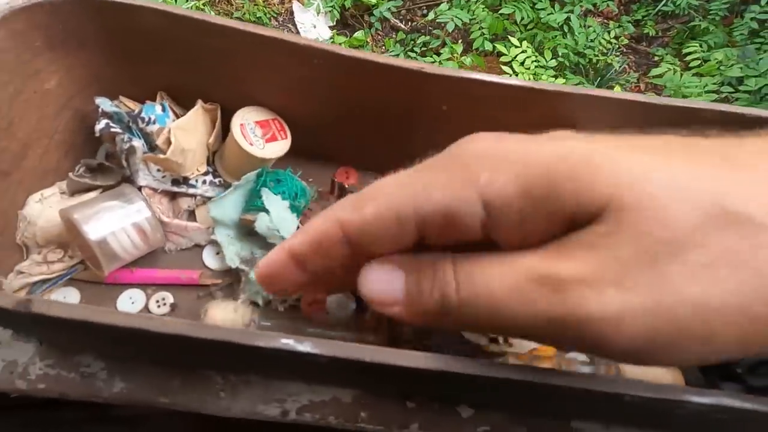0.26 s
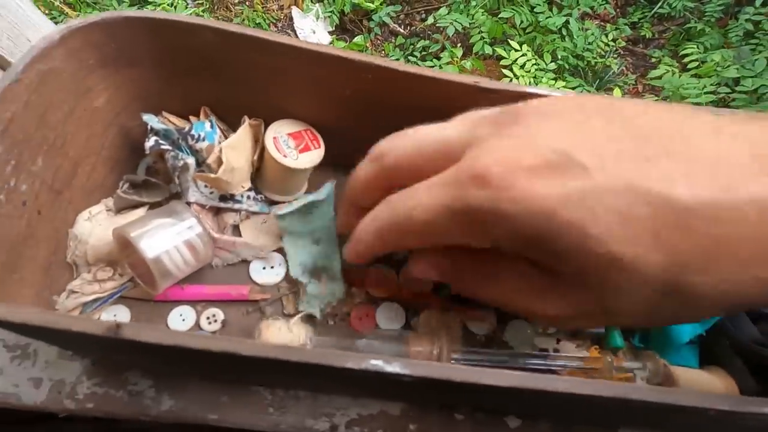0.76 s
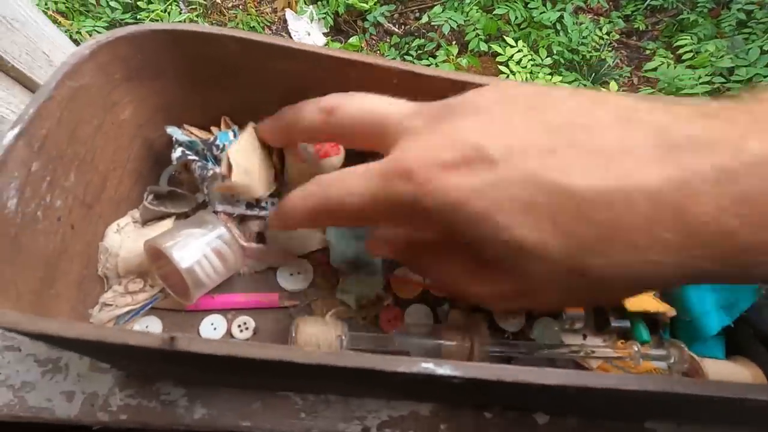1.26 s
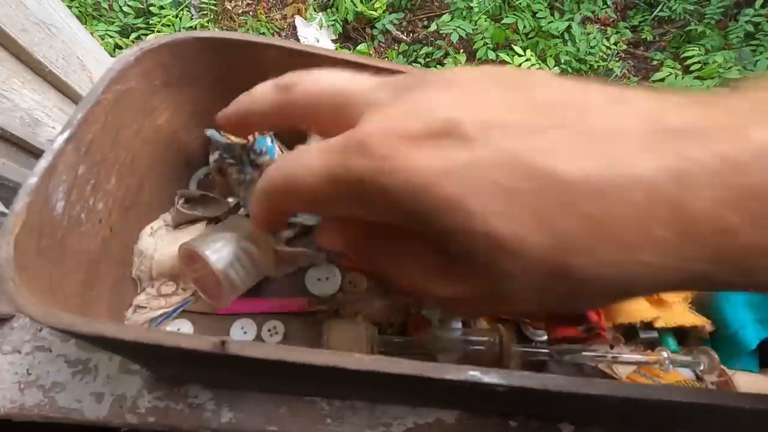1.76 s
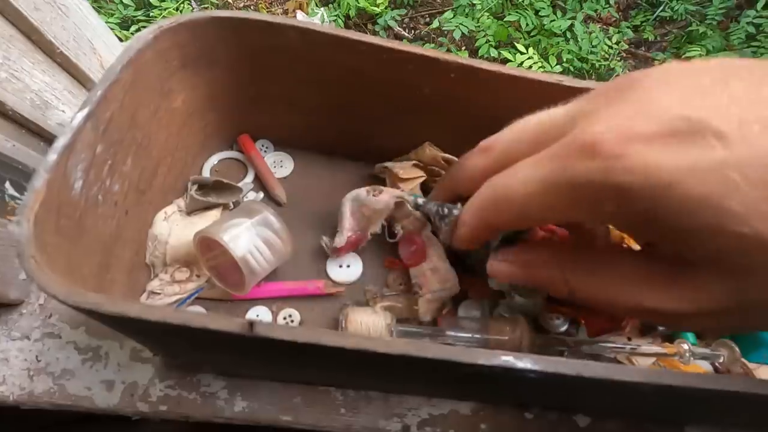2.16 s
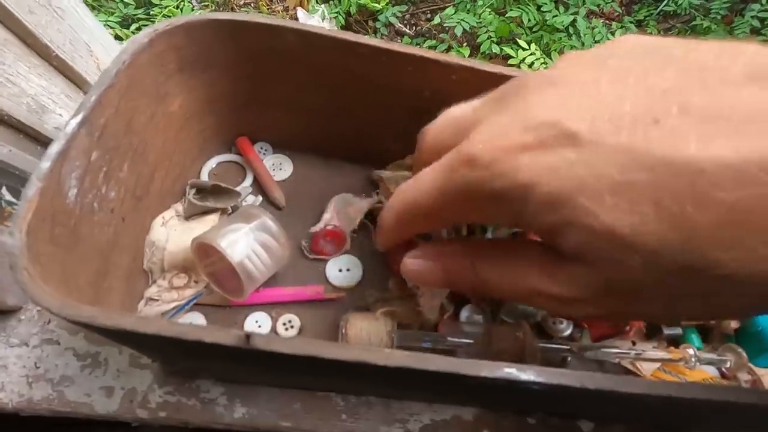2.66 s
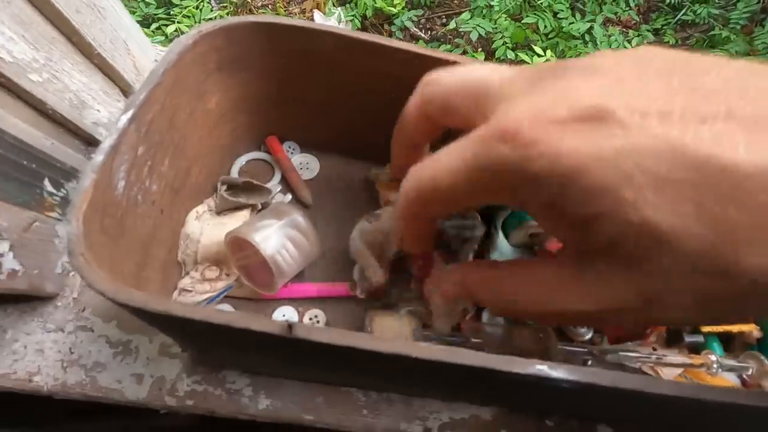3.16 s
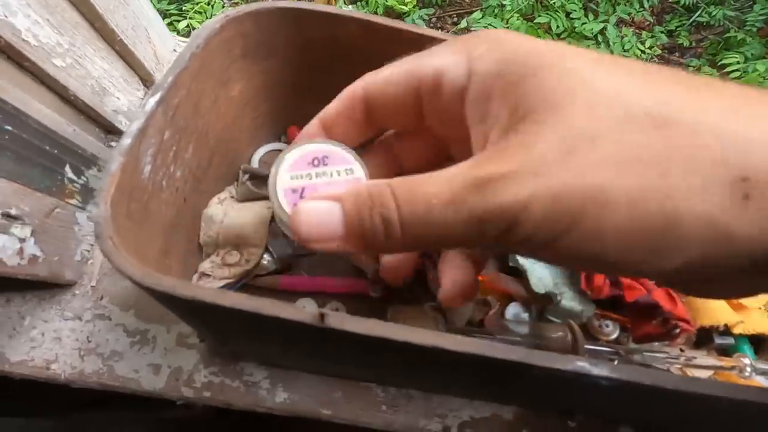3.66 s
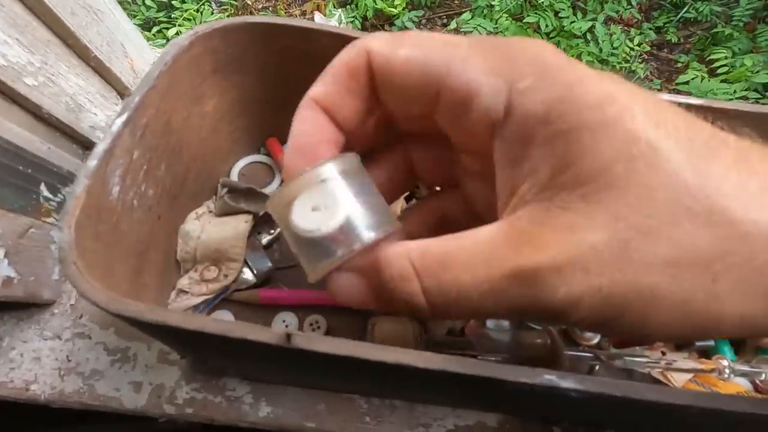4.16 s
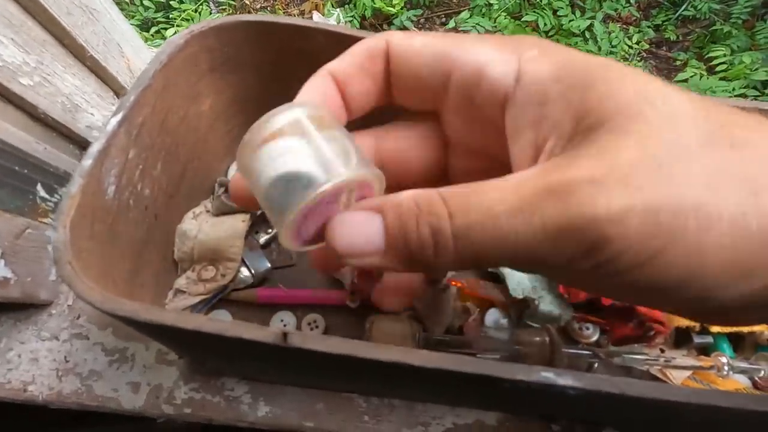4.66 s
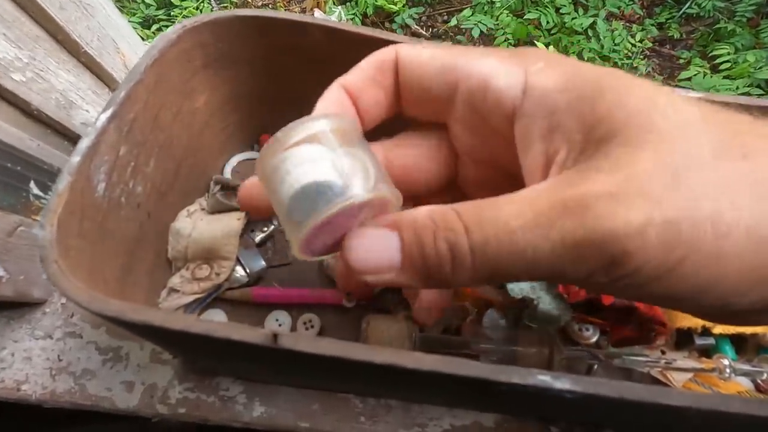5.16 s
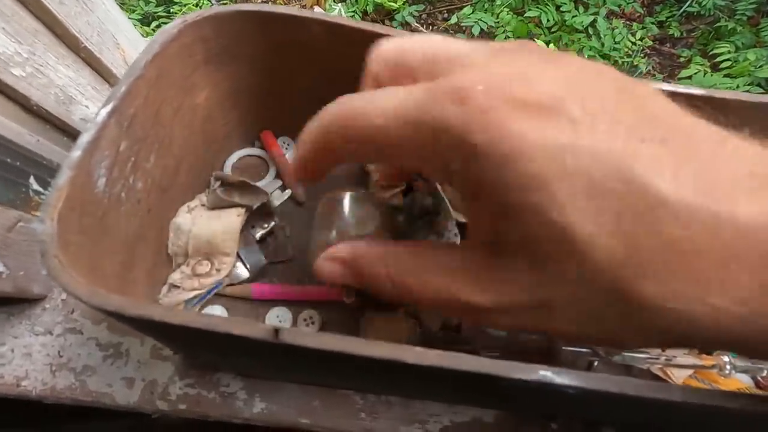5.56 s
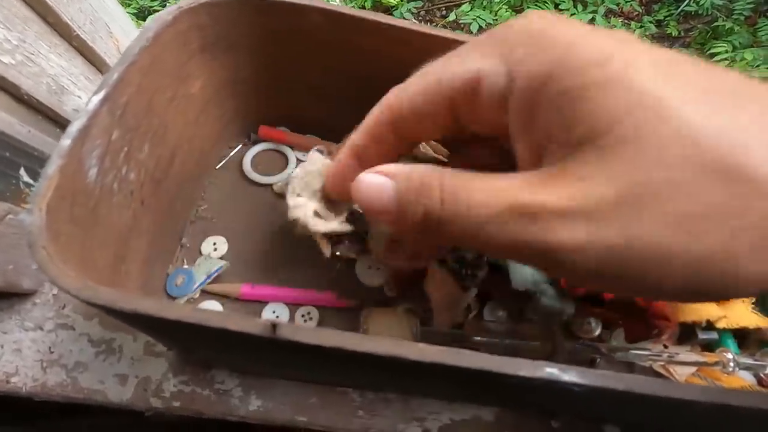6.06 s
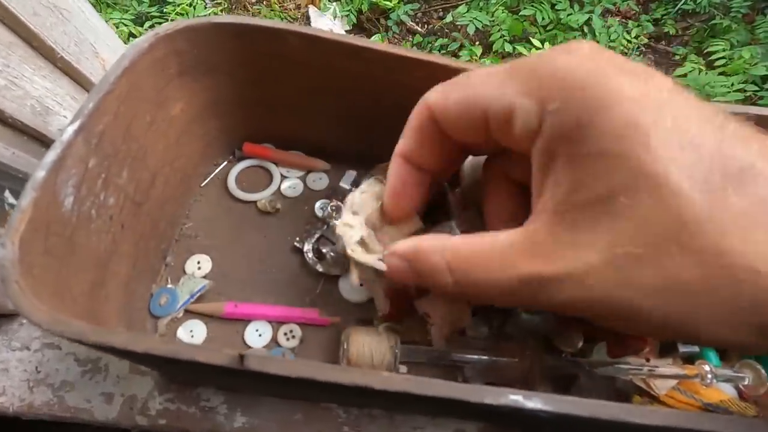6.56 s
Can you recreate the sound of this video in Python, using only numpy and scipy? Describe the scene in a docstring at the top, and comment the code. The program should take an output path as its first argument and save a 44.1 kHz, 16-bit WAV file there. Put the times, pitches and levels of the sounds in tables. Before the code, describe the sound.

Outdoors, dry and close: dull knocks on drawer boards, hard button clicks and short rubbing of cloth and paper, irregular and crowded for two seconds. A softer rustling lull follows, then another knock and clatter, then near quiet with isolated sharp tinkling ticks. Late on, a rapid metallic rattle bursts out with more knocks. Throbbing high cricket trills and a faint low drone continue behind.

```python
"""Outdoors beside weeds: a hand rummages in a wooden drawer, close to a small camera microphone.
Spools and knuckles knock the boards, and buttons and metal parts click: decaying sines, led by each blow's pitch.
Cloth and paper drag along the bottom: random slips ringing the resonances of boards, buttons and crackle.
Crickets trill in the weeds as throbbing narrow noise, and a lone one, a pulsed sine, joins later.
Behind them lie the open air, as shaped noise, and a far motor's drone, as three wavering harmonics."""
import sys
import numpy as np
from scipy import signal
from scipy.fft import rfft, irfft
from scipy.io import wavfile
from scipy.ndimage import uniform_filter1d

SR = 44100
rng = np.random.default_rng(int(sys.argv[2]) if len(sys.argv) > 2 else 0)


def master(y):
    """Save y as 16-bit WAV."""
    cut = np.clip(np.atleast_2d(y).T, -1, 1)
    pcm = np.round(cut * 32767)  # scale
    wavfile.write(sys.argv[1], SR, pcm.astype(np.int16))


N = 300762  # length in samples

# open air, relative noise density: pitch_hz, level_db (per Hz)
AIR_SPECTRUM = [(25, -14), (60, -10), (120, -5), (200, -1.5), (320, -8), (600, -15), (1200, -15.5),
                (3000, -14.5), (5000, -23), (7300, -11.5), (8200, -26.5), (9100, -24.5), (10300, -25.5),
                (11200, -42), (12300, -40), (13000, -43), (16000, -64)]
AIR_RMS_DB = -47.5

# harmonics of the far motor: multiple (of the fundamental), level_db
MOTOR_HARMONICS = [(1, -68), (2, -55.5), (3, -56.5)]
MOTOR_HZ = 87.1

# two groups of trilling crickets, lower one first: pitch_hz, spread_hz, throbs_per_s
TRILLERS = [(6030, 110, 31), (6310, 130, 34.3)]
# trills of the higher group: middle_s, level_db
HIGH_TRILLS = [(.07, -41), (.52, -44.5), (.68, -55), (1.12, -56), (1.32, -51), (1.6, -43), (1.97, -50),
               (2.2, -50), (2.41, -50), (2.7, -52), (2.88, -57), (3.18, -43), (3.54, -46), (4.0, -53),
               (4.45, -43.5), (4.75, -52), (4.92, -49), (5.27, -45.5), (5.74, -48), (6.04, -46), (6.4, -53),
               (6.75, -47)]
HIGH_TRILL_S = 0.088  # from the middle to 1/e of the gain
LOW_TRILL_DB, LOW_FIRST_S, LOW_PER_S, LOW_TRILL_S = -49.5, 0.1, 2.9, 0.076
BETWEEN_TRILLS_DB = (-59.5, -54.5)  # lower group, higher group
FAR_CRICKETS_RMS_DB = -52
LONE_HZ, LONE_RMS_DB, LONE_PULSES_PER_S = 6965, -59, 14.815
LONE_PHASE_S, LONE_JOINS_S = .001, 3.8

# pushes of the hand through the heap: start_s, length_s, boards_db, parts_db (buttons and paper), crackle_db
PUSHES = [(0.048, 0.1, -39, -53, -70), (0.22, 0.14, -42.5, -46.5, -66), (0.364, 0.045, -20.5, -36, -74),
          (0.41, 0.032, -28.5, -37.5, -80), (0.758, 0.17, -32, -39, -66), (0.873, 0.076, -28.5, -33, -55),
          (0.964, 0.076, -33.5, -48, -61), (1.034, 0.029, -35.5, -41, -64), (1.09, .08, -42, -49, -68),
          (1.159, 0.063, -24.5, -41.5, -64), (1.213, 0.079, -43, -38, -74),
          (1.409, 0.087, -39.5, -45, -50.5), (1.459, 0.032, -20, -34, -43.5),
          (1.509, 0.12, -23.5, -31.5, -44), (1.627, 0.085, -28.5, -34, -49),
          (1.764, 0.12, -32.5, -43.5, -57), (1.953, 0.022, -30.5, -32.5, -42.5),
          (2.01, 0.082, -37, -33.5, -46), (2.099, 0.12, -27.5, -32, -39.5), (2.208, 0.12, -37.5, -48, -64),
          (2.301, 0.079, -35, -40, -65), (2.422, 0.21, -47, -50.5, -59), (2.739, 0.14, -48.5, -47.5, -54),
          (2.948, 0.069, -43, -51.5, -57), (3.09, 0.3, -43, -43.5, -48.5), (3.334, 0.12, -34, -47.5, -66),
          (3.432, 0.17, -39.5, -49.5, -67), (3.602, 0.079, -32, -36.5, -49.5),
          (3.713, 0.059, -39.5, -47, -51), (3.844, 0.033, -35.5, -52, -67), (4.585, 0.2, -56, -49, -60),
          (5.438, 0.25, -56, -53.5, -58), (5.584, 0.034, -35, -44, -55), (5.652, 0.031, -50, -59, -67),
          (5.884, .065, -28, -31, -43), (6.011, 0.076, -22.5, -32.5, -54), (6.081, 0.082, -29.5, -38, -52),
          (6.162, 0.046, -34, -39, -47.5), (6.275, 0.048, -40, -50, -63), (6.35, 0.057, -51, -44, -60),
          (6.604, 0.024, -33, -43.5, -68), (6.683, 0.11, -44, -52.5, -59)]
PUSH_ATTACK_S, SETTLE_DB_PER_S = 0.0067, 186
SWELL_SHARE = .25  # share of a push's length added to its attack: longer pushes swell more slowly
RESTING_DB = (-57, -73, -75)  # boards, parts, crackle while the hand barely moves

# resonances of drawer boards and air: pitch_hz, width_hz, level_db
DRAWER_MODES = [(101, 52, -11), (121, 23, -8), (174, 54, -0.5), (230, 61, -1), (294, 88, -3), (394, 57, -6),
                (467, 115, -2.5), (557.8, 61, -5.5), (653, 67, -3.5), (859, 124, -3.5), (961, 150, -3),
                (1230, 250, -0.5), (1466, 470, -7)]
# resonances of buttons and plastic cup: pitch_hz, width_hz, level_db
PARTS_MODES = [(1523, 310, -6), (1781, 180, -7.5), (2063, 400, -4), (2448, 284, -6), (2827, 680, -1),
               (3365, 1200, -1.5), (3900, 650, -3), (4420, 260, -7), (5030, 1740, -3)]
# resonances at the top of the crackle: pitch_hz, width_hz, level_db
CRACKLE_MODES = [(7200, 580, 4.5), (7960, 1150, -9), (10130, 220, -1), (11900, 500, -13),
                 (14200, 4500, -53)]
BOARDS_LEAN_DB, PARTS_LEAN_DB = 6, 4.5  # dB per octave away from the pitch of the blows nearby

# blows on the boards: start_s, level_db (peak), pitch_hz (strongest ring)
KNOCKS = [(.077, -17, 303), (.097, -22, 244), (0.117, -27.5, 232), (.324, -26, 666), (.38, -8.5, 540),
          (.441, -18, 175), (0.473, -24, 490), (0.775, -14, 406), (0.828, -13, 387), (0.868, -13.5, 490),
          (0.891, -13, 643), (0.911, -14.5, 664), (.939, -17, 420), (0.954, -15, 445), (.97, -18, 674),
          (0.996, -24, 460), (1.043, -12, 450), (1.093, -36, 127), (1.183, -2.5, 630), (1.197, -16, 573),
          (1.238, -18, 450), (1.465, -5.5, 497), (1.496, -8, 383), (1.52, -15.5, 110), (1.533, -9, 420),
          (1.549, -20, 240), (1.585, -11, 438), (1.637, -19, 340), (1.695, -16, 390), (1.792, -15.5, 440),
          (1.845, -9.5, 500), (1.91, -19.5, 460), (1.962, -11.5, 405), (2.03, -22.5, 900),
          (2.058, -13.5, 880), (2.128, -13.5, 815), (2.201, -19, 450), (2.345, -24.5, 248),
          (2.583, -28, 570), (3.388, -5.5, 680), (3.434, -17.5, 660), (3.49, -23, 314), (3.607, -23.5, 455),
          (3.637, -18.5, 460), (3.69, -13.5, 905), (3.763, -25, 1040), (3.849, -11, 620),
          (3.866, -23.5, 586), (5.582, -10.5, 710), (5.679, -21, 630), (5.891, -19.5, 259),
          (5.926, -23, 870), (5.945, -24, 940), (5.981, -18, 418), (6.013, -9, 454), (6.046, -11, 495),
          (6.076, -16, 470), (6.121, -27, 458), (6.169, -13, 443), (6.228, -22, 484), (6.608, -19, 275),
          (6.628, -11.5, 704), (6.768, -29, 243)]

# small parts clicking, levels are peaks: start_s, metal_db, metal_hz, plastic_db, plastic_hz, top_db
CLICKS = [(.079, -47, 5960, -35, 3450, -43), (.3, -50, 6000, -31, 2950, -46),
          (0.323, -53, 6350, -25.5, 1720, -59), (0.3373, -44, 6500, -25, 2900, -47),
          (0.3769, -26, 6160, -0.5, 1460, -33), (0.9345, -18.5, 6850, -12, 3120, -28.5),
          (0.9418, -27, 5600, -17, 3130, -42), (0.968, -41, 6430, -23.5, 2010, -51),
          (1.0584, -33, 7060, -23.5, 3560, -32.5), (1.1859, -20.5, 5700, -6.5, 1770, -35),
          (1.234, -24, 7010, -17.5, 1730, -45), (1.245, -26, 7110, -11.5, 1820, -33),
          (1.273, -23, 6000, -13, 2960, -40), (1.4668, -42, 6330, -11, 1500, -55),
          (1.4957, -38, 7150, -16.5, 1500, -41), (1.5834, -16.5, 5940, -16, 2950, -25.5),
          (1.604, -34, 6940, -21, 3120, -42), (1.655, -36, 6920, -17.5, 2140, -44),
          (1.6648, -22.5, 5430, -19, 2120, -26), (1.7041, -22, 7100, -19, 2750, -31),
          (1.713, -19.5, 6900, -19, 2130, -36), (1.847, -46, 6500, -23.5, 1510, -46),
          (1.9097, -33, 5900, -23.5, 1810, -34), (1.9635, -20.5, 6730, -25, 1840, -47),
          (1.9779, -10.5, 7150, -14, 2480, -31), (2.029, -34, 5650, -4, 2760, -36),
          (2.0575, -37, 7590, -10.5, 2280, -50), (2.111, -20.5, 7320, -31, 4240, -25),
          (2.131, -33, 6780, -22, 2970, -40), (2.1619, -22, 5800, -28, 2350, -24),
          (2.5855, -25, 6050, -22.5, 2790, -34), (2.882, -40, 6000, -36, 4380, -45),
          (3.097, -36, 5600, -32, 3320, -48), (3.3361, -37, 6270, -31, 2840, -32),
          (3.3896, -32, 6100, -17.5, 1510, -54), (3.5748, -19, 6250, -24.5, 5100, -41),
          (3.607, -27, 6560, -22, 3950, -55), (3.638, -14, 6900, -22, 2100, -32),
          (3.6426, -30, 6990, -17, 4000, -44), (3.6564, -31, 7140, -17, 3720, -47),
          (3.672, -23, 6590, -31, 2120, -48), (3.6819, -33, 6720, -14, 2070, -36),
          (3.6886, -24, 6640, -14, 2040, -32), (3.7574, -27.5, 5760, -36, 2460, -27.5),
          (3.763, -36, 6120, -23, 1900, -46), (3.851, -45, 6220, -23, 1730, -59),
          (4.076, -48, 6500, -33, 2050, -60), (4.122, -23.5, 6700, -44, 1960, -48),
          (4.2373, -23, 7970, -22, 3170, -40), (4.2853, -24.5, 7260, -37, 4510, -35),
          (4.6008, -15.5, 6260, -18, 4100, -37), (4.6106, -20, 6370, -22, 4000, -48),
          (4.6831, -2, 6860, -31, 4450, -28), (4.6947, -21, 6500, -45, 2490, -51),
          (4.735, -12, 7800, -17, 3670, -24), (4.8266, -10, 6460, -35, 4590, -49),
          (5.4629, -16.5, 7800, -24.5, 4600, -36), (5.576, -24, 6830, -26.5, 4700, -41),
          (5.58, -36, 6430, -21, 1480, -53), (5.616, -31, 6640, -23, 2070, -54),
          (5.6393, -0.5, 6500, -25, 4070, -23), (5.6542, -16.5, 6550, -35, 4530, -41),
          (5.8726, -10.5, 6960, -23, 2490, -39), (5.878, -7, 6600, -30, 2690, -33),
          (5.8843, -14, 6600, -36, 2710, -45), (5.8928, -5.5, 6900, -17.5, 2120, -22),
          (5.902, -6, 7020, -34, 2450, -29), (5.912, -2, 6660, -16, 3290, -23),
          (5.9185, -2, 6900, -29, 2470, -35), (5.9242, -7, 7200, -27, 2550, -37),
          (5.9303, -3, 6800, -23, 2490, -26), (5.941, -4, 6950, -17, 3640, -30),
          (5.983, -38, 6970, -25, 1830, -55), (6.019, -26, 6330, -18, 2050, -56),
          (6.03, -28, 6340, -18, 2060, -54), (6.0639, -30, 6970, -28, 2660, -46),
          (6.122, -47, 5860, -22, 2900, -51), (6.1463, -44, 6610, -20, 2020, -41),
          (6.1693, -39, 7000, -25, 1800, -51), (6.3479, -9.5, 6740, -18.5, 4250, -25),
          (6.3912, -19, 7220, -18, 4200, -41), (6.397, -21.5, 7620, -21, 4460, -45),
          (6.426, -20, 6710, -35, 3780, -39), (6.628, -46, 6100, -21.5, 1500, -56)]
# resonances of small metal pieces: pitch_hz, width_hz, level_db
METAL_MODES = [(5370, 84, -8), (6030, 91, -12), (6820, 166, -1), (7430, 220, -5.5), (7750, 750, -20)]
# glassy top of a click: pitch_hz, width_hz, level_db
TOP_MODES = [(8540, 420, 4.5), (9060, 500, 2), (9580, 510, -1), (9900, 500, 4), (10560, 520, 4),
             (12000, 500, -10), (11950, 500, 0), (12970, 500, -11), (14160, 500, -9)]
# time for a resonance of average width to fall 60 dB
KNOCK_T60_S, METAL_T60_S, PLASTIC_T60_S, TOP_T60_S = 0.044, .014, 0.019, 0.022

STRAY_COUNT = 260
STRAY_OVER_DB, STRAY_SCATTER_DB = (2, 5.5, 4), 5  # metal, plastic, top: over the rubbing gain

MIC_TOP_HZ = 15700


def undb(db):
    """Decibels to gain."""
    return 10 ** (np.asarray(db) / 20)


def level(x, db):
    """Scale to an rms level."""
    return x * undb(db) / np.sqrt(np.mean(x ** 2))


def band(x, hz, width):
    """One resonance, gain 1 at its centre."""
    return signal.lfilter(*signal.iirpeak(hz, hz / width, fs=SR), x)


def walk(rate):
    """Random levels, drawn `rate` times a second and joined by slides; spread near 1."""
    hold = int(SR / rate)
    steps = np.repeat(rng.standard_normal(N // hold + 1), hold)
    return 1.2 * uniform_filter1d(steps, hold)[:N]


def add(out, start_s, x):
    """Mix a short sound in at a time."""
    i = int(start_s * SR)
    out[i:i + len(x)] += x[:N - i]


def air():
    """Leaves, far traffic and far insects as gently breathing noise."""
    hz = np.fft.rfftfreq(N, 1 / SR) + 1
    points_hz, points_db = np.array(AIR_SPECTRUM).T
    shape = undb(np.interp(np.log(hz), np.log(points_hz), points_db, left=-60))
    noise = irfft(rfft(rng.standard_normal(N)) * shape, N)
    return level(noise * undb(walk(3.17)), AIR_RMS_DB)


def motor():
    """A far motor drones: its speed wavers slightly and each harmonic's level wanders."""
    turn = 2 * np.pi * np.cumsum(MOTOR_HZ * (1 + 0.00316 * walk(1.97))) / SR
    return sum(undb(db + 3.0 * walk(4)) * np.sin(k * turn) for k, db in MOTOR_HARMONICS)


def chorus(t):
    """Gain of both cricket groups: the lower trills in strict time, the higher unevenly."""
    beat = ((t - LOW_FIRST_S) * LOW_PER_S + .5) % 1 - .5
    low = undb(LOW_TRILL_DB + 2.5 * walk(3.1)) * np.exp(-(beat / LOW_PER_S / LOW_TRILL_S) ** 2)
    high = sum(undb(db) * np.exp(-((t - middle) / HIGH_TRILL_S) ** 2) for middle, db in HIGH_TRILLS)
    return np.array([low, high]) + undb(BETWEEN_TRILLS_DB)[:, None]


def trillers():
    """Two groups at neighbouring pitches throb and swell: narrow noise under a wavering beat."""
    out = np.zeros(N)
    for (hz, width, rate), gain in zip(TRILLERS, chorus(np.arange(N) / SR)):
        beat = 2 * np.pi * np.cumsum(rate * (1 + 0.038 * walk(2.4))) / SR
        throb = .5 + .5 * np.cos(beat)
        # several wings, slightly out of tune
        wings = band(band(rng.standard_normal(N), hz, width), hz, 2 * width)
        out += gain * level((1.16 + throb) * wings, 0)
    return out


def far_crickets():
    """Many more crickets, further off, blur into a steady band of noise."""
    blur = band(band(rng.standard_normal(N), 6320, 700), 6320, 700)
    return level(blur, FAR_CRICKETS_RMS_DB)


def pushes():
    """Gain of boards, parts and crackle: each push sets in, holds, and the heap settles."""
    t = np.arange(N) / SR
    power = undb(RESTING_DB)[:, None] ** 2 * np.ones(N)
    for start, length, *db in PUSHES:
        a, b = int(start * SR), int((start + length + .4) * SR)
        since = t[a:b] - start
        swell = np.clip(since / (PUSH_ATTACK_S + SWELL_SHARE * length), 0, 1)
        settle = undb(-SETTLE_DB_PER_S * np.maximum(since - length, 0))
        power[:, a:b] += (undb(db)[:, None] * swell * settle) ** 2
    return np.sqrt(power)


def nearby(rows, column):
    """Pitch of the blows around each moment: what is struck is also what slides."""
    table = np.array(rows)
    log_pitch = 20 * np.log10(table[:, column])
    return undb(np.interp(np.arange(N) / SR, table[:, 0], log_pitch))


def grains(rate, spread_db, bed):
    """Random slips, most small and a few large, over a bed of rubbing noise."""
    hit = rng.random(N) < rate / SR
    size = undb(spread_db * np.minimum(rng.exponential(size=N), 2.5))
    return level(hit * rng.standard_normal(N) * size, 0) + bed * rng.standard_normal(N)


def rubbed(modes, push, wander_db, wander_rate, lean_hz, lean_db):
    """Slips ring every mode; which modes answer shifts as the contact moves."""
    gain = np.array([undb(db + wander_db * walk(wander_rate) - lean_db * np.abs(np.log2(hz / lean_hz)))
                     for hz, _, db in modes])
    # hold the modes' combined gain nearly even over a tenth of a second
    gain = gain / uniform_filter1d(np.sqrt(np.mean(gain ** 2, axis=0)), int(.1 * SR))
    out = np.zeros(N)
    for k, (hz, width, _) in enumerate(modes):
        # a second, wider pass keeps each mode from spilling far up the spectrum
        ring = band(band(push, hz, width), hz, 1.22 * hz) / np.sqrt(width)
        out += (-1) ** k * gain[k] * ring
    return level(out, 0)


def dragging(gain):
    """Things slide over the bottom: coarse slips shake the boards, finer ones the buttons and paper."""
    stutter_db = 2.14 * walk(45)  # the whole heap sticks and lets go together
    boards_hz, parts_hz = nearby(KNOCKS, column=2), nearby(CLICKS, column=4)
    boards = rubbed(DRAWER_MODES, grains(250, 2.7, 1.0), 3.94, 14, boards_hz, BOARDS_LEAN_DB)
    parts = rubbed(PARTS_MODES, grains(900, 1.5, 1.0), 2.8, 20, parts_hz, PARTS_LEAN_DB)
    crackle = rubbed(CRACKLE_MODES, grains(500, 4.0, .5), 2.0, 25, lean_hz=9000, lean_db=0)
    return undb(stutter_db) * (gain * np.array([boards, parts, crackle])).sum(axis=0)


def struck(modes, chance, lean_hz, lean_db, t60, contact):
    """One blow: modes swell during contact and die away, those near its pitch favoured; peak 1."""
    t = np.arange(int(2 * t60 * SR)) / SR
    hz, width, db = np.transpose(modes)[:, :, None]
    detune, strength, phase = chance[:, :len(hz), None]
    hz = hz * (1 + 0.032 * detune)  # loose pieces never ring twice alike
    db = db + 2.0 * strength - lean_db * np.abs(np.log2(hz / lean_hz))
    # wider modes die sooner
    fade = np.exp(-np.log(1000) * t / t60 * np.sqrt(width / width.mean()))
    ring = (undb(db) * fade * np.sin(2 * np.pi * hz * t + 1.375 * phase)).sum(axis=0)
    blow = ring * (1 - np.exp(-t / contact)) ** 2
    return blow / np.abs(blow).max()


def knocks():
    """Dry, dull blows on the wood ring the board modes nearest each blow's pitch."""
    out, chance = np.zeros(N), rng.standard_normal((len(KNOCKS), 3, 16))
    for (start, db, hz), c in zip(KNOCKS, chance):
        add(out, start, undb(db) * struck(DRAWER_MODES, c, hz, 13.1, KNOCK_T60_S, contact=0.00036))
    return out


def clicks(rows):
    """Hard little collisions: a bright metal ring, the plastic around it, and a sharp top."""
    out, chance = np.zeros(N), rng.standard_normal((len(rows), 3, 3, 16))
    for (start, metal_db, metal_hz, plastic_db, plastic_hz, top_db), c in zip(rows, chance):
        metal = struck(METAL_MODES, c[0], metal_hz, 67.0, METAL_T60_S, contact=0.00014)
        plastic = struck(PARTS_MODES, c[1], plastic_hz, 11.6, PLASTIC_T60_S, contact=0.00034)
        top = struck(TOP_MODES, c[2], 12000, 0, TOP_T60_S, contact=0.00041)
        add(out, start, undb(metal_db) * metal)
        add(out, start, undb(plastic_db) * plastic)
        add(out, start, undb(top_db) * top)
    return out


def strays(gain):
    """Chance collisions in the moving heap, following the rubbing around them; rows as in CLICKS."""
    when, metal, plastic = rng.random((STRAY_COUNT, 3)).T
    # metal and plastic follow the parts, the top follows the crackle
    db = 20 * np.log10(gain[[1, 1, 2]][:, (when * N).astype(int)].T)
    db = db + STRAY_OVER_DB + STRAY_SCATTER_DB * rng.standard_normal((STRAY_COUNT, 3))
    metal_hz, plastic_hz = 5900 + 1400 * metal, 1700 * 2 ** plastic
    return np.c_[when * N / SR, db[:, 0], metal_hz, db[:, 1], plastic_hz, db[:, 2]]


def lone_cricket():
    """A lone cricket joins later, higher and slower: a slightly unsteady sine in rounded pulses."""
    t = np.arange(N) / SR
    phase = ((t - LONE_PHASE_S) * LONE_PULSES_PER_S) % 1
    chirp = np.exp(-((phase - .5) / 0.17) ** 2) * undb(2.0 * walk(8.4))
    fade_in = np.clip((t - LONE_JOINS_S) / 0.37, 0, 1)
    tone = np.sin(2 * np.pi * np.cumsum(LONE_HZ * (1 + 0.00344 * walk(40))) / SR)
    return level(chirp * fade_in * tone, LONE_RMS_DB)


def scene():
    """The small drawer radiates no deep bass; everything reaches both channels alike."""
    gain = pushes()
    no_bass = signal.butter(4, 82, "highpass", fs=SR, output="sos")
    drawer = signal.sosfilt(no_bass, dragging(gain) + knocks())
    small_parts = clicks(CLICKS) + clicks(strays(gain))
    surroundings = air() + motor() + trillers() + far_crickets() + lone_cricket()
    heard = drawer + small_parts + surroundings
    return np.array([heard, heard])


def record(dry):
    """Two ports in a small housing: a notch, dull top, a resonance on the left; the loudest peaks clip."""
    mid = dry[0] - 0.92 * band(dry[0], 8960, 500)
    mid = signal.sosfilt(signal.butter(3, 13800, fs=SR, output="sos"), mid)
    mid = np.clip(mid, -.96, .96)
    port = band(band(mid, 12350, 1500), 12350, 1500)
    late = np.roll(mid, 300)  # samples, about 7 ms
    late_top = band(band(late, 12800, 1500), 12800, 1500)
    side = 0.71 * port + undb(-63) * late + undb(-35) * band(late, 5100, 2800) + undb(-4) * late_top
    rumble = level(band(rng.standard_normal(N), 35, 40), -83)  # air on the ports, opposite left and right
    wet = np.array([mid + side + rumble, mid - side - rumble])
    return signal.sosfilt(signal.ellip(10, .2, 90, MIC_TOP_HZ, fs=SR, output="sos"), wet)


dry = scene()
out = record(dry)
master(out)
```